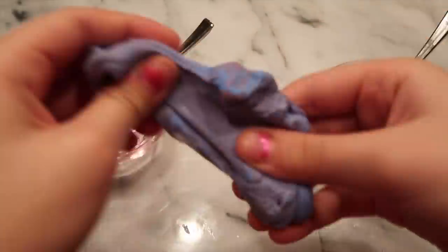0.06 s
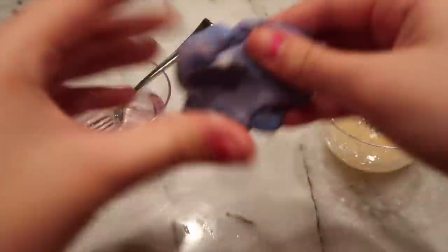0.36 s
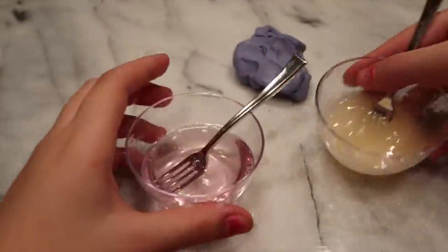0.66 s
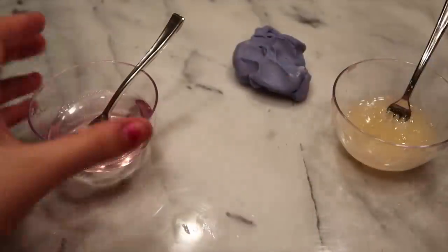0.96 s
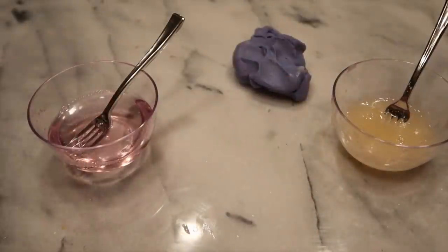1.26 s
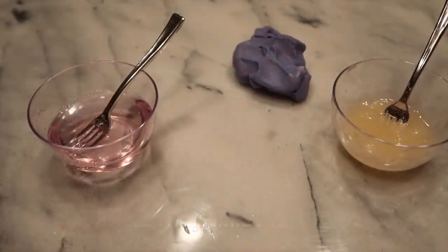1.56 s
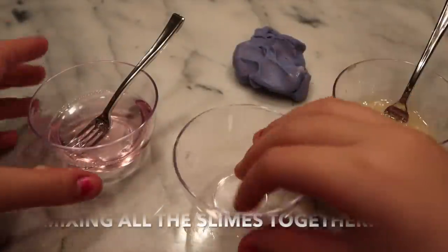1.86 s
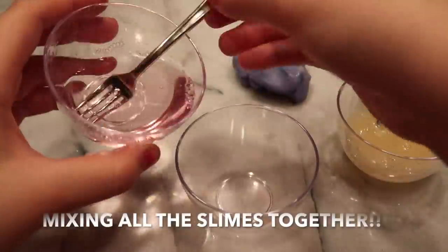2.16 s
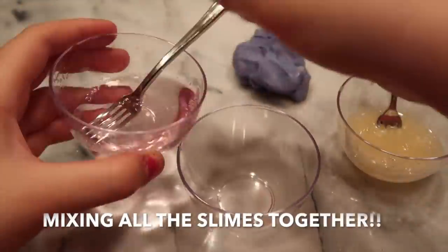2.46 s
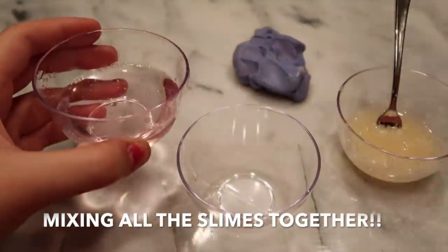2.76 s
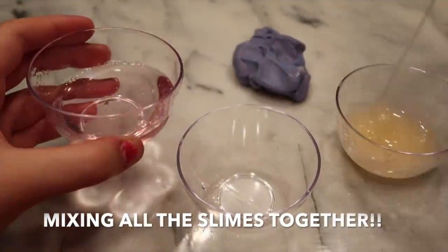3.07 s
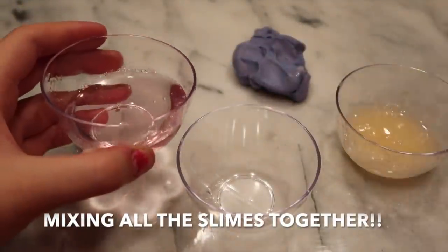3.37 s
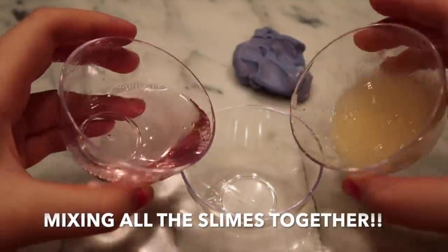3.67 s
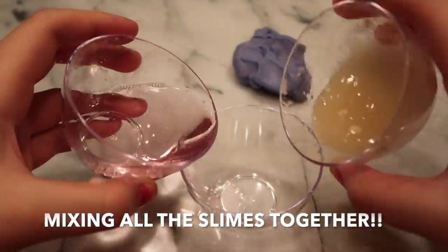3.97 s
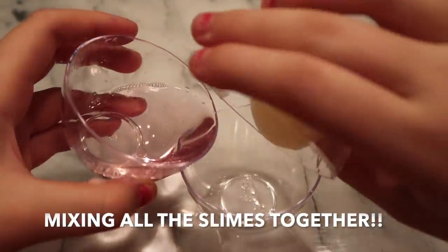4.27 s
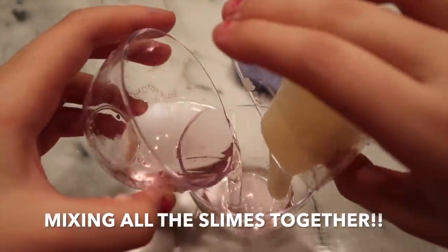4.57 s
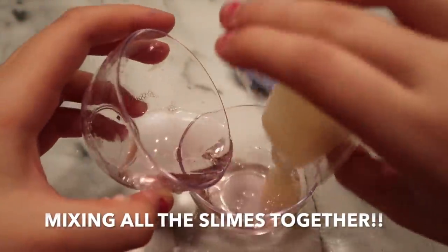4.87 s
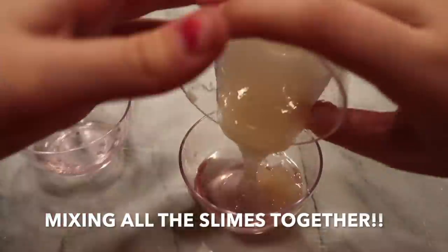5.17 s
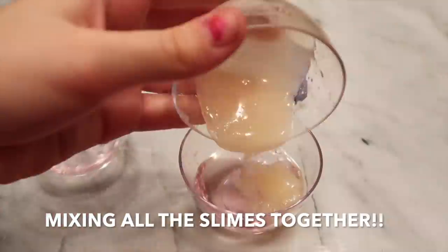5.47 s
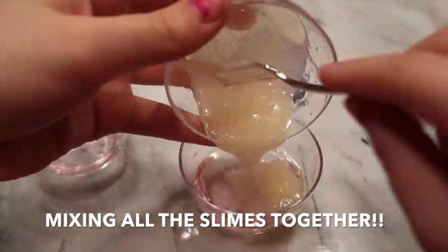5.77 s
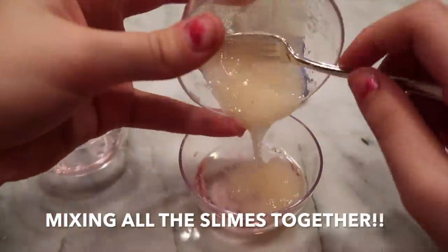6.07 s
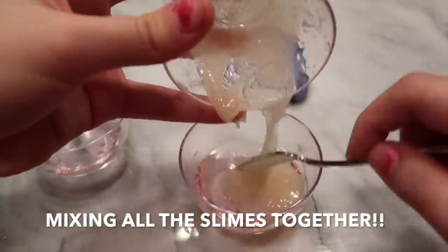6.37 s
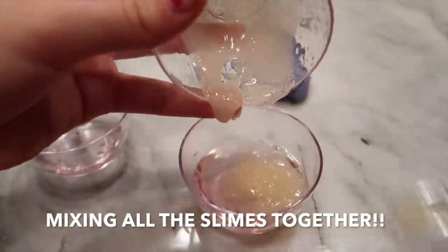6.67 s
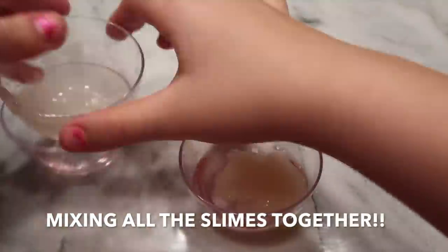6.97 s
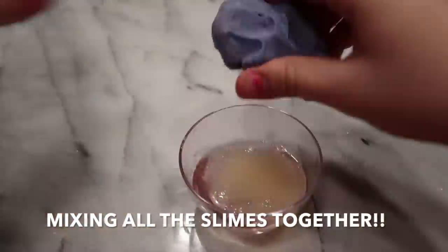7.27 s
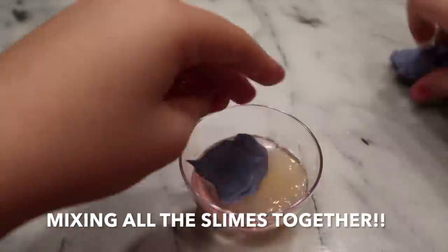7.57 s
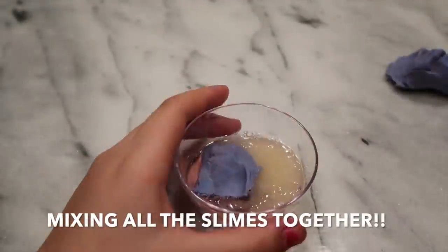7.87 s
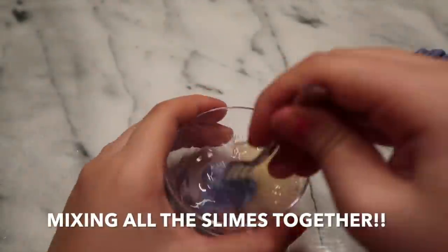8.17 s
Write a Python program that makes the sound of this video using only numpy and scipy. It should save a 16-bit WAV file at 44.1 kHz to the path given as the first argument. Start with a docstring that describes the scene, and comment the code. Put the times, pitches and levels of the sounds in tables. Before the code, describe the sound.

Small plastic cups clack and metal forks clink on a stone counter, close to the microphone in a small room. Early on, a cup rasps off a stack and is set down with sharp clacks. Lighter taps, faint hand rustles and tiny bubble snaps follow as slime is poured and scraped out. The loudest clinks come near the end. An appliance hums steadily underneath.

```python
"""Small clear cups clack and metal forks clink on a stone counter while slime is poured and scraped out.
Each touch sets plastic and metal ringing and makes the counter thud. Cups rub in runs of tiny slips,
and a fresh one catches and rasps off a stack. Hands rustle, putty is put down, bubbles snap in the
slime and a nudged camera rumbles on its stand. An appliance hums steadily in the small room."""
import sys
import numpy as np
from scipy import signal
from scipy.fft import rfft, irfft, next_fast_len
from scipy.io import wavfile
from scipy.ndimage import map_coordinates

SR = 44100
rng = np.random.default_rng(int(sys.argv[2]) if len(sys.argv) > 2 else 0)


def int16_out(signal):
    """Quantize to a 16-bit WAV file."""
    q = np.round(np.clip(np.atleast_2d(signal).T, -1, 1) * 32767)
    wavfile.write(sys.argv[1], SR, q.astype(np.int16))


N = 371322
TIME = np.arange(N) / SR
HIT_SAMPLES = SR // 3   # length of one short sound
HIT_TIME = np.arange(HIT_SAMPLES) / SR
KNOCK_OCTAVES = 1.2   # width of a cup's hollow knock

# Cups and forks touching: t/s, level/dB, clack f/Hz, clack width/octaves, knock f/Hz, knock/dB,
# treble snap f/Hz, snap/dB, cup's note f/Hz, note/dB, part struck
CUP_TOUCHES = [(0.556, -11, 5000, 1.4, 1100, -4, 10600, -11, 3160, -6, "rim"),
               (0.581, -14, 3100, .7, 1150, -1, 13000, -10, 3220, -5, "rim"),
               (0.6444, -14, 3200, 1.3, 1700, -5, 9000, -27, 2740, -6, "side"),
               (0.893, -3, 4400, 1.1, 1000, -4, 11150, -6.5, 3730, -5, "side"),
               (0.8952, -1, 4540, 0.68, 1300, -8.5, 13000, -19, 3730, -5, "side"),
               (0.9311, -9, 4200, 0.59, 1100, -10, 11150, -27, 3760, -14, "side"),
               (1.859, 9, 6650, .36, 900, -25, 10000, -23, 3310, -14, "edge"),
               (1.869, -1.5, 6700, 0.36, 950, -22, 14200, -7, 3410, -12, "edge"),
               (1.9068, -11, 6700, .6, 950, -10, 9900, -22, 2900, -7, "edge"),
               (1.924, -19, 6800, 0.43, 950, -12, 9900, -23, 3280, 1, "edge"),
               (1.9957, 6, 5130, 0.76, 706, -11.5, 8600, -18, 3760, -13, "edge"),
               (2.019, -5, 4290, .8, 1100, -13, 8700, -18, 3740, -9, "side"),
               (2.0255, 2, 4600, 1.1, 1500, -12, 10500, -14, 3830, -10, "side"),
               (3.412, -22, 8000, 0.66, 950, -1, 12900, -1, 3730, -18, "rim"),
               (3.492, -17.5, 5800, 1.3, 1700, 0, 10000, -16, 3180, -6, "side"),
               (3.495, -14, 4000, 1.2, 1900, -5, 13000, -20, 3500, -11, "side"),
               (3.626, -17.5, 3620, 2.6, 1500, -2, 9000, -13, 2690, -6, "rim"),
               (3.643, -23, 2600, 0.92, 1400, 0, 9000, -22, 2720, -2, "side"),
               (3.83, -9.5, 7060, 0.39, 950, -7, 13000, -24, 3040, -31, "edge"),
               (4.5243, -11, 6600, .26, 950, -3, 12000, -32, 3270, -12, "edge"),
               (4.871, -21, 3150, .6, 1100, -6, 7500, -14, 3150, -8, "rim"),
               (4.9227, -14.5, 4700, 1.2, 1100, -5, 8900, -24, 3750, -14, "side"),
               (4.97, -5, 6340, 0.39, 950, -8, 12900, -18, 3250, -10, "side"),
               (5.041, 5, 6300, .55, 1150, -10, 12170, -12, 3900, -13, "side"),
               (5.083, .5, 7100, 0.6, 1400, -11, 9700, -17, 4070, -12, "fork"),
               (5.5347, -11.5, 7500, 1.1, 1190, -6, 13000, -3, 3690, -2, "ping"),
               (7.0, -13, 5870, 0.65, 1500, -3.5, 8800, -5.5, 4100, -7, "side"),
               (7.008, -17, 4500, 1.2, 1500, -3, 12800, -7, 2450, -5, "side"),
               (7.035, -18.5, 4800, 0.95, 1200, 3, 12800, -13, 3200, -7, "side"),
               (7.0884, -7, 3700, 1.3, 1400, -4, 8650, -19, 3700, -12, "side"),
               (7.141, -22, 4300, .6, 1100, -3, 12000, -25, 4100, -14, "side"),
               (7.181, 2, 2950, 1.5, 1390, -7, 12800, -14, 4100, -9, "fork"),
               (7.249, 13.5, 4650, .58, 1500, -6.5, 11000, -33, 1190, -17.5, "foot"),
               (7.4221, 3, 3130, 1.9, 1000, -2, 9900, -15, 1020, -6, "base"),
               (7.425, -2.5, 2100, 1.3, 1350, -3, 10800, -17, 1860, -5, "base"),
               (7.749, -13.5, 3800, 0.77, 1100, -4, 9000, -20, 2380, -7, "side"),
               (7.762, -7.5, 3900, 1.5, 1100, -5.5, 8500, -18, 2350, -6, "side"),
               (8.189, 3.5, 3400, 1.5, 1350, -3.5, 10300, -21, 3360, -5, "wall"),
               (8.202, -8, 3450, .35, 1100, -17, 8450, -24, 3410, -8, "side")]
# How each struck part sounds: chatter time/s (negative: one instant), room/dB, wall ring/dB,
# rim ring/dB, fork ring/dB, counter thud/dB, plastic body/dB
PART_SOUNDS = {"edge": (0.01, -9, -17, -27, -25, -27, -13), "side": (.0004, -6.5, -10, -22, -21, -19, -9),
               "wall": (-0.14, -14.5, -2.5, -26, -24, -15.5, -24),
               "rim": (0.3, -1.5, -4, -11, -13, -7, -5.5), "ping": (-0.1, -3, -18, -3, -25, -24, -8),
               "fork": (.0004, -7, -15, -24, -8, -14, -8), "foot": (-0.08, -4, -16, -18, -24, -24, -17),
               "base": (-0.14, -1, -14, -17, -29, -12, -7)}
# A cup wall's modes (the tones it rings with): f/Hz, level/dB, t60/s (time to fade by 60 dB)
WALL_MODES = [(1157, -1.5, 0.055), (1420, -5.5, 0.052), (1860, -1, 0.06), (2624, -2.5, 0.044),
              (2925, 6, 0.036), (3190, 3, 0.029), (3378, 4, 0.048), (3900, 0, 0.056), (5500, -10, 0.04),
              (6900, -8, 0.05), (8440, -16, .06), (10200, -10, .05)]


def from_db(db):
    """Turn decibels into a gain."""
    return 10 ** (np.asarray(db) / 20)


def rms_one(x):
    """Scale to an average power of 1."""
    return x / np.sqrt(np.mean(x ** 2) + 1e-20)


def unit_energy(x):
    """Scale so the squares add up to 1."""
    return x / np.sqrt(np.sum(x ** 2) + 1e-20)


def at_hz(points, hz):
    """Read a curve at a given frequency, on a scale of octaves."""
    known_hz, values = np.transpose(points)
    return np.interp(np.log(np.maximum(hz, 1)), np.log(known_hz), values)


def colour(x, spectrum):
    """Shape the tone with a curve of f/Hz, gain/dB."""
    size = next_fast_len(len(x))
    gain = from_db(at_hz(spectrum, np.fft.rfftfreq(size, 1 / SR)))
    return irfft(rfft(x, size) * gain, size)[:len(x)]


def band(x, low_hz, high_hz, order=2):
    """Keep what lies between two frequencies."""
    edges = [min(low_hz, .4 * SR), min(high_hz, .45 * SR)]
    return signal.sosfilt(signal.butter(order, edges, "band", fs=SR, output="sos"), x + 1e-18)


def drift(per_s):
    """A smooth random wobble of about size 1."""
    knots = rng.standard_normal(2000)
    return rms_one(map_coordinates(knots, [TIME * per_s], order=3, mode="wrap"))


def ticks(per_s, count=HIT_SAMPLES):
    """Tiny pushes and pulls at random moments."""
    return (rng.random(count) < per_s / SR) * rng.choice([-1, 1], count)


def add(track, s, sound):
    """Mix a sound in, starting at s seconds."""
    start = round(s * SR)
    track[..., start:start + sound.shape[-1]] += sound[..., :N - start]


def ring(hz, t60):
    """One mode: a pure tone that fades."""
    return np.sin(2 * np.pi * hz * HIT_TIME) * from_db(-60 * HIT_TIME / t60)


def struck(modes, spread_db=2):
    """Every blow rings an object's modes with new strengths."""
    sound = 0
    for hz, db, t60 in modes:
        strength = from_db(db + spread_db * rng.standard_normal())
        sound += strength * rng.choice([-1, 1]) * ring(hz, t60)
    return unit_energy(sound)


def mode_pair(hz, gap, t60):
    """Two close tones, a fraction `gap` apart, pulse as they fade."""
    return struck([(hz * (1 + side * gap / 2), 0, t60) for side in (-1, 1)])


def damped(push, hz, octaves):
    """A cluster of modes answers a push and dies at once."""
    edge = 2 ** (max(octaves, .1) / 2)
    return unit_energy(band(push, hz / edge, hz * edge))


def stereo(mid, side):
    """Left and right share `mid` and differ by `side`, mostly in the treble."""
    # Stereo width: f/Hz, side gain/dB
    width = [(50, -25), (200, -43), (500, -34), (1400, -16), (3000, -12.5), (5600, -8), (10000, -5.5),
             (15000, -4)]
    return mid + colour(side, width) * np.array([[1], [-1]])


def echoes(rise_s=.00016):
    """Dense reflections off counter and walls fade band by band."""
    # The room's fade time: f/Hz, t60/s
    room_fade = [(500, 0.13), (1300, 0.089), (3500, 0.14), (9000, 0.085), (15000, 0.12)]
    edges = np.geomspace(100, 18000, 8)
    tail = 0
    for low, high in zip(edges, edges[1:]):
        t60 = at_hz(room_fade, np.sqrt(low * high))
        tail += band(rng.standard_normal(HIT_SAMPLES), low, high) * from_db(-60 * HIT_TIME / t60)
    return unit_energy(tail * (1 - np.exp(-HIT_TIME / rise_s)))


def in_room(direct, sent):
    """The direct sound plus echoes of what is sent into the room."""
    mid, side = (signal.fftconvolve(sent, echoes())[:len(sent)] for _ in range(2))
    return stereo(direct + mid, side)


def appliance(waver_per_s=14, air_db=-44):
    """Motor and fan tones, some firm and some wavering, over a rush of air."""
    # The hum's tones: f/Hz, level/dB, unsteadiness (0 is firm)
    hum_tones = [(272.5, -57.5, 1.2), (319.4, -62.5, 0.78), (336, -65.5, 0.31), (539.6, -46.5, 0.084),
                 (586.5, -51.5, 0.2), (919.6, -56, 1.5), (1010, -64, 0.44), (1081, -47, 0.023),
                 (1178, -59, 0.55), (1420, -60.5, 0.85), (1634, -69, 0.98), (1754, -60.5, 1.2)]
    # The rushing air's colour: f/Hz, gain/dB
    air_colour = [(25, -29), (50, -14), (80, -23), (125, -14), (170, -13), (275, -5), (450, -2.5), (750, 1),
                  (1150, -2.5), (1550, -6.5), (2300, -11), (3400, -12.5), (5000, -20), (9000, -24),
                  (15500, -30.5)]
    hum = 0
    for hz, db, unsteady in hum_tones:
        waver = 1 + unsteady * (drift(waver_per_s) + 1j * drift(waver_per_s))   # in level and pitch
        tone = np.exp(2j * np.pi * (hz * TIME + rng.random()))
        hum += from_db(db) * rms_one(np.real(waver * tone))
    mid, side = (rms_one(colour(rng.standard_normal(N), air_colour)) for _ in range(2))
    return hum + from_db(air_db) * stereo(mid, side)


def camera_nudges(rise_s=.029, side_db=-28):
    """Soft pushes rock the camera stand; it rumbles a little more on the left."""
    # Pushes: t/s, level/dB
    pushes = [(0.742, -48), (3.93, -46), (4.07, -40), (4.145, -43), (4.205, -51), (4.88, -52),
              (5.13, -41.5), (5.53, -47), (7.91, -39), (8.04, -38.5), (8.201, -38)]
    # The stand's modes: f/Hz, level/dB, t60/s
    stand_modes = [(51.2, 1.5, 0.31), (120, 5, 0.11)]
    rocking = sum(from_db(db) * ring(hz, t60) for hz, db, t60 in stand_modes)
    rocking *= 1 - np.exp(-HIT_TIME / rise_s)
    out = np.zeros(N)
    for s, db in pushes:
        add(out, s, from_db(db) * rocking)
    return out * (1 + from_db(side_db) * np.array([[1], [-1]]))


def hand_rustles(grains_per_s=2500, spread_db=5, uneven_db=2, uneven_per_s=30, room_db=-1):
    """Skin brushes over plastic and slime peels: swells of tiny, uneven ticks."""
    # Hands shifting on cups, putty and slime: t/s, length/s, level/dB
    moves = [(0, 0.35, -59.5), (.38, 0.15, -59), (1.096, 0.17, -62), (2.28, 0.37, -62), (2.45, 0.066, -58),
             (3.08, 0.23, -59), (3.66, 0.45, -62), (4.22, 0.24, -65), (5.135, 0.31, -60.5),
             (5.563, 0.086, -60.5), (5.84, 0.49, -65), (6.398, 0.34, -58.5), (6.796, 0.18, -55),
             (7.497, 0.22, -58.5), (7.875, .25, -57)]
    # The rustle's colour: f/Hz, gain/dB
    rustle_colour = [(800, -18), (2500, 5), (4500, 1), (7000, 1), (10000, -5.5), (16000, -9)]
    pressure = np.zeros(N)
    for s, length, db in moves:
        add(pressure, s, from_db(db) * np.sqrt(np.hanning(round(length * SR))))
    grains = ticks(grains_per_s, N) * from_db(spread_db * np.clip(rng.standard_normal(N), -2, 2))
    uneven = from_db(uneven_db * drift(uneven_per_s))
    out = pressure * rms_one(colour(grains, rustle_colour) * uneven)
    return in_room(out, from_db(room_db) * out)


def slime_bubbles(room_db=-8):
    """Bubbles burst with a dry snap; a larger air pocket adds a short hollow pop."""
    # Bursts: t/s, level/dB, pop against snap/dB
    bursts = [(.945, -19, -20), (1.058, -8, 4.5), (5.947, -27, -20), (6.2054, -20, -20), (6.2657, -21, -20),
              (6.3882, -18, -10)]
    # The air pocket's modes: f/Hz, level/dB, t60/s
    pocket_modes = [(650, 2, 0.013), (1100, 3.5, 0.0094), (1930, 1.5, 0.0082)]
    snap = unit_energy(band(signal.unit_impulse(HIT_SAMPLES), 1300, 9100, order=1))
    pocket = sum(from_db(db) * ring(hz, t60) for hz, db, t60 in pocket_modes)
    pop = unit_energy(band(pocket, 500, 2700))
    out = np.zeros(N)
    for s, db, pop_db in bursts:
        add(out, s, from_db(db) * (snap + from_db(pop_db) * pop))
    return in_room(out, from_db(room_db) * out)


def cup_drags(slips_per_s=1000, spread_db=5, judder_db=1.5, judder_per_s=90, ease_s=.022,
              wall_db=-9, room_db=-2):
    """A sliding cup judders: a run of tiny slips keeps its wall rattling."""
    # Slides over the stone: t/s, length/s, level/dB, centre f/Hz
    slides = [(.6, 0.078, -48, 2700), (1.319, 0.1, -48.5, 3800), (7.028, 0.073, -49.5, 3900)]
    out = np.zeros(N)
    judder = from_db(judder_db * drift(judder_per_s))
    for s, length, db, hz in slides:
        slips = ticks(slips_per_s) * from_db(spread_db * rng.standard_normal(HIT_SAMPLES))
        rub = damped(slips, hz, octaves=.82)
        rattle = unit_energy(signal.fftconvolve(slips, struck(WALL_MODES))[:HIT_SAMPLES])
        stroke = np.clip(np.minimum(HIT_TIME, length - HIT_TIME) / ease_s, 0, 1)
        add(out, s, from_db(db) * stroke * rms_one(rub + from_db(wall_db) * rattle))
    out *= judder
    return in_room(out, from_db(room_db) * out)


def cup_rasps(slips_per_s=1000, spread_db=6, room_db=-1, level_db=-3, catch_db=3.5):
    """A rubbing rim lets go with a click and a fading burst of tiny slips."""
    # Cups rubbing on each other and the counter: t/s, relative level/dB, fade/s, brightness/dB
    rubs = [(.375, -49, 0.045, 9), (.795, -42, 0.021, -3), (1.3031, -31, 0.011, 1.5),
            (1.315, -34, 0.015, 17), (1.334, -40, .016, 10), (1.358, -33, .012, 10),
            (1.3712, -30.5, 0.011, 4), (1.4151, -28, 0.011, 2.5), (1.427, -38, .012, -1),
            (1.458, -34.5, .005, 7), (1.501, -43, 0.018, 6), (3.436, -45, .028, -4), (3.468, -44, .026, -5),
            (4.143, -47, 0.029, 11), (5.526, -42, .026, 21)]
    # The rasp's colour: f/Hz, gain/dB
    rasp_colour = [(300, -19), (700, 10.5), (1400, -1), (2700, 6), (3900, 2), (5500, 3.5), (7000, -8),
                   (9500, -1), (12000, -10.5), (13700, -8), (14250, -5), (14800, -13), (16000, -16)]
    out = np.zeros(N)
    catch = from_db(catch_db) * signal.unit_impulse(HIT_SAMPLES, 20)
    for s, db, fade, bright_db in rubs:
        slips = ticks(slips_per_s) * from_db(spread_db * rng.uniform(-1.5, 1, HIT_SAMPLES))
        rasp = colour(slips + catch, rasp_colour)
        rasp = rms_one(colour(rasp, [(3000, 0), (12000, bright_db)]))
        add(out, s, from_db(db + level_db) * rasp * np.exp(-HIT_TIME / fade))
    return in_room(out, from_db(room_db) * out)


def stack_catches(stutter_s=.003, knock_db=-1.5, room_db=-4):
    """A stuck rim breaks free in a quick stutter that shakes the cup's wall and its hollow."""
    # The stacked cup coming loose: t/s, level/dB, wall f/Hz, knock f/Hz
    releases = [(1.304, -9.5, 2900, 840), (1.4163, -9.5, 2500, 950)]
    out = np.zeros(N)
    for s, db, wall_hz, knock_hz in releases:
        stutter = rng.standard_normal(HIT_SAMPLES) * np.exp(-HIT_TIME / stutter_s)
        wall = damped(stutter, wall_hz, octaves=.6)
        knock = from_db(knock_db) * damped(stutter, knock_hz, KNOCK_OCTAVES)
        add(out, s, from_db(db) * (wall + knock))
    return in_room(out, from_db(room_db) * out)


def counter_thuds(light_touch_hz=536, db_per_octave=12, putty_hz=254, room_db=-2):
    """The heavy counter answers each touch, and the soft putty, with a short, dull thud."""
    # The lump of putty is put down: t/s, level/dB
    putty_landings = [(.497, -19), (7.717, -16.5)]
    blows = [(s, db, putty_hz) for s, db in putty_landings]
    for s, db, *_, part in CUP_TOUCHES:
        *_, thud_db, _ = PART_SOUNDS[part]
        hz = light_touch_hz / 2 ** (max(db, 0) / db_per_octave)   # hard blows press longer, thud lower
        blows.append((s, db + thud_db, hz))
    out = np.zeros(N)
    for s, db, hz in blows:
        add(out, s, from_db(db) * damped(signal.unit_impulse(HIT_SAMPLES), hz, octaves=1.84))
    return in_room(out, from_db(room_db) * out)


def counter_echo(x, delay_s=(.0007, .0024), echo_db=-9):
    """A sound plus its bounce off the stone, delayed by a random amount for the cup's height."""
    lag = round(rng.uniform(*delay_s) * SR)
    gain = from_db(echo_db)
    return (x + gain * np.pad(x, (lag, 0))[:len(x)]) / np.hypot(1, gain)


def plastic_body(low_hz=1413, high_hz=5795, t60=.019, count=40):
    """Thin plastic has a crowd of quickly fading modes, new for every touch."""
    return struck([(hz, 0, t60) for hz in rng.uniform(low_hz, high_hz, count)])


def cup_and_fork_clinks(knock_direct_db=-5, knock_room_db=-1, ring_room_db=-5, contact_hz=8900,
                        chatter_db=-6, snap_ring_db=-1):
    """Each touch gives a chattering clack, a hollow knock, a treble snap and a ring of cup and fork."""
    # A fork's modes: f/Hz, level/dB, t60/s
    fork_modes = [(1730, -6, 0.12), (2340, -1, 0.07), (2720, -6, 0.089), (4075, -2, 0.12), (6280, 3, 0.09),
                  (6350, 0, 0.065), (7000, 5, 0.055), (7913, -10, .08), (9400, -5, .05), (13200, -10, 0.05)]
    # The rim's overtones: ratio to the cup's note, level/dB, t60/s
    rim_modes = [(1.336, -2, 0.087), (1.89, 3, 0.04), (2.57, -2, 0.06), (2.8, 2, 0.055), (3.52, -3, 0.06)]
    out = np.zeros((2, N))
    contact = signal.unit_impulse(HIT_SAMPLES)
    for s, db, hz, octaves, knock_hz, knock_db, snap_hz, snap_db, note_hz, note_db, part in CUP_TOUCHES:
        chatter_s, room_db, wall_db, rim_db, fork_db, _, body_db = PART_SOUNDS[part]
        knock = from_db(knock_db) * damped(contact, knock_hz, KNOCK_OCTAVES)
        chatter_shape = HIT_TIME * np.exp(-HIT_TIME / max(chatter_s, 1 / SR))
        chatter = unit_energy(rng.standard_normal(HIT_SAMPLES) * chatter_shape)
        touch = contact + from_db(chatter_db) * chatter
        press = band(touch, 420, contact_hz, order=4)   # contact lasts a moment, limiting the treble

        snap_ring = from_db(snap_ring_db) * mode_pair(snap_hz, gap=.015, t60=.033)
        snap = unit_energy(damped(touch, snap_hz, octaves=.39) + snap_ring)
        clack = damped(press, hz, octaves) + from_db(body_db) * plastic_body() + from_db(snap_db) * snap

        # the cup's note depends on the cup, its filling and the grip
        rim = struck([(ratio * note_hz, mode_db, t60) for ratio, mode_db, t60 in rim_modes])
        rings = from_db(note_db) * mode_pair(note_hz, gap=.035, t60=.04) + from_db(rim_db) * rim
        rings += from_db(wall_db) * struck(WALL_MODES) + from_db(fork_db) * struck(fork_modes)

        room_gain = from_db(room_db)
        clack /= np.hypot(1, room_gain)   # direct sound and echoes share the energy
        direct = clack + from_db(knock_direct_db) * knock + rings
        sent = room_gain * clack + from_db(knock_room_db) * knock + from_db(ring_room_db) * rings
        add(out, s, from_db(db) * in_room(counter_echo(direct), sent))
    return out


def scene():
    """Everything on the counter, over the rumble and the hum."""
    rumble = camera_nudges()
    cups = cup_and_fork_clinks() + counter_thuds() + cup_drags() + cup_rasps() + stack_catches()
    return cups + hand_rustles() + slime_bubbles() + rumble + appliance()


def record(dry, ceiling_db=-2, release_db_per_s=28, cutoff_hz=15900):
    """A limiter turns the level down after the hardest clacks; the highest treble is cut."""
    peak_db = 20 * np.log10(np.abs(dry).max(axis=0) + 1e-9)
    over_db = np.maximum(peak_db - ceiling_db, 0)
    recovery_db = release_db_per_s * TIME
    dip_db = np.maximum.accumulate(over_db + recovery_db) - recovery_db
    low_pass = signal.ellip(10, .2, 80, cutoff_hz, fs=SR, output="sos")
    return signal.sosfilt(low_pass, dry * from_db(-dip_db))


dry = scene()
out = record(dry)
int16_out(out)
```